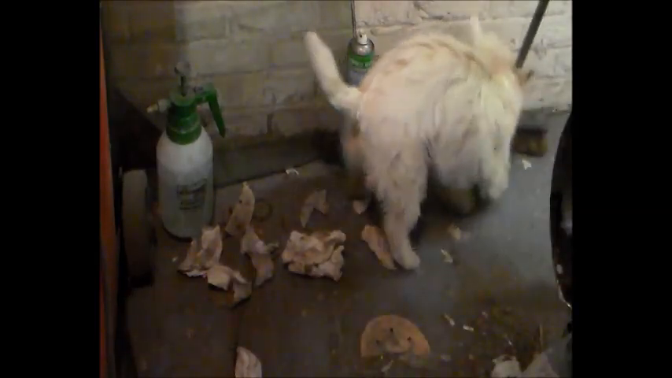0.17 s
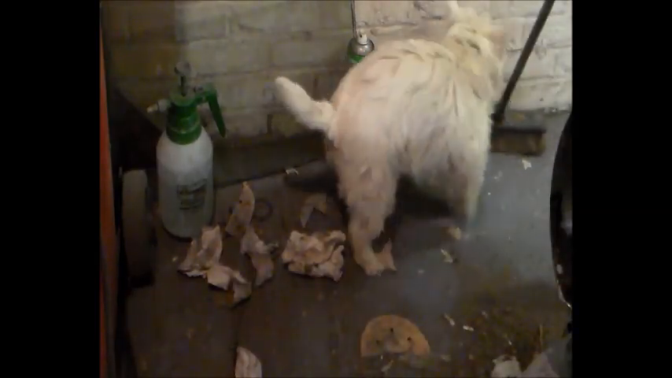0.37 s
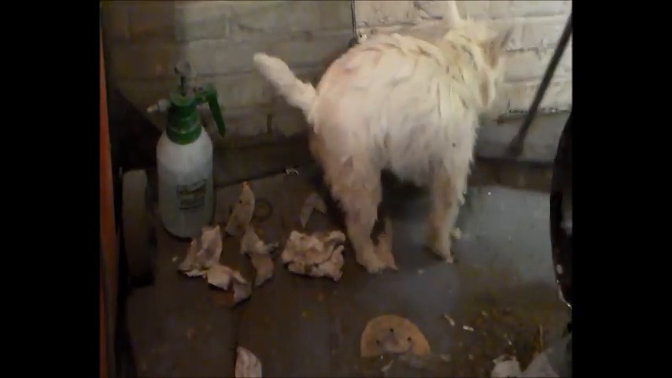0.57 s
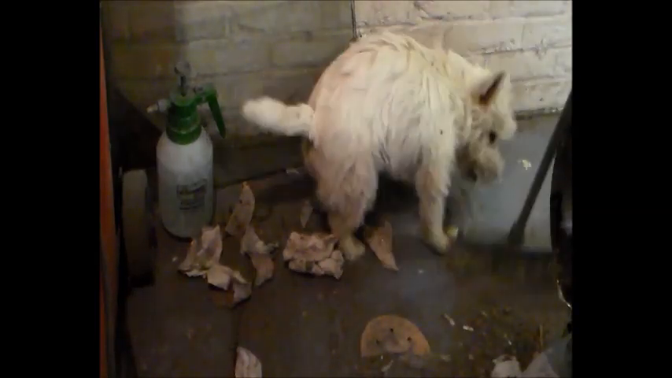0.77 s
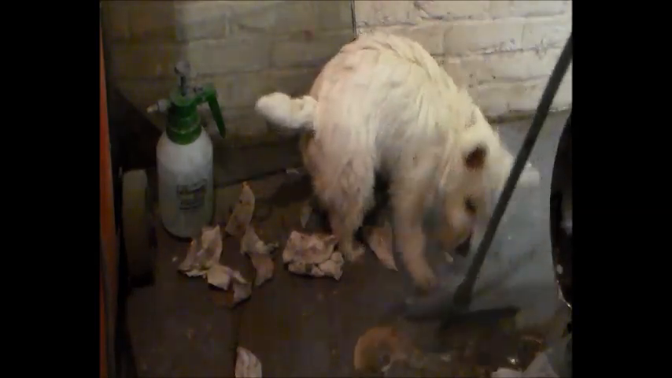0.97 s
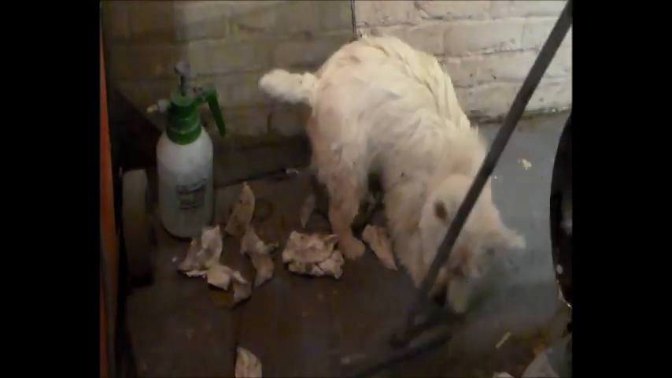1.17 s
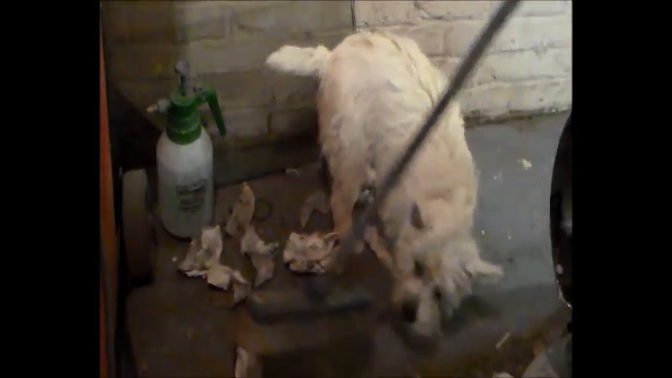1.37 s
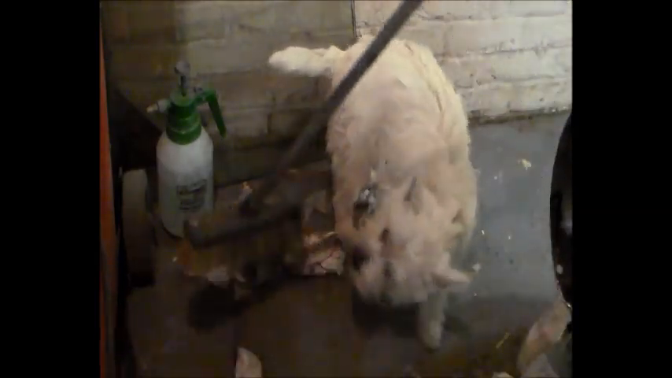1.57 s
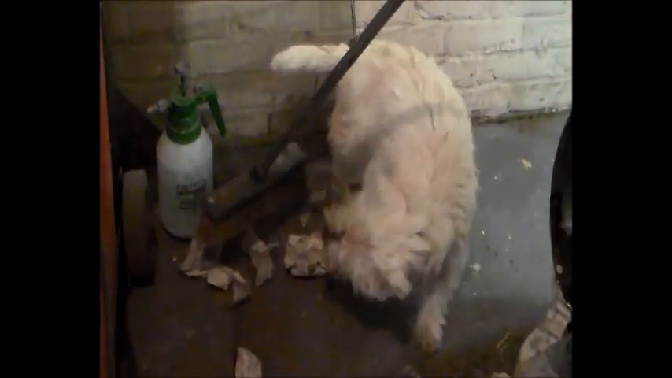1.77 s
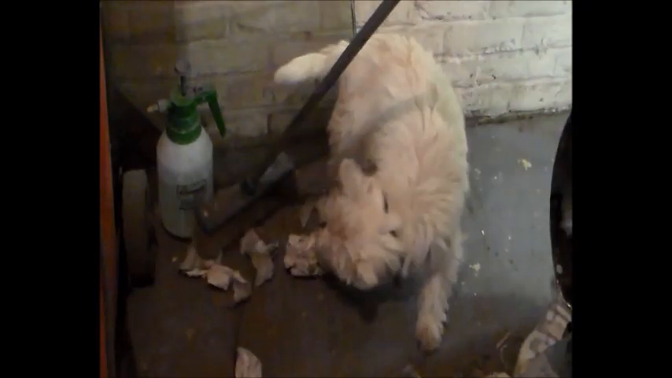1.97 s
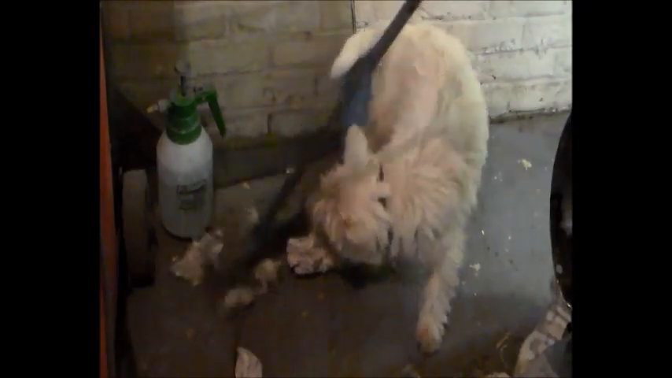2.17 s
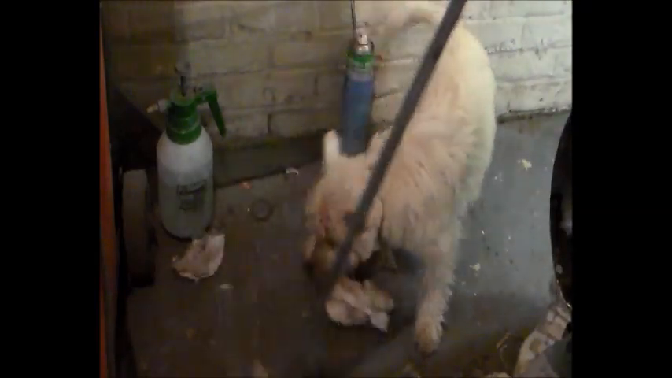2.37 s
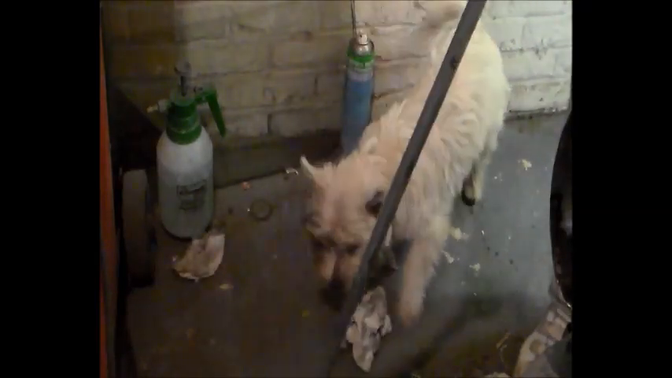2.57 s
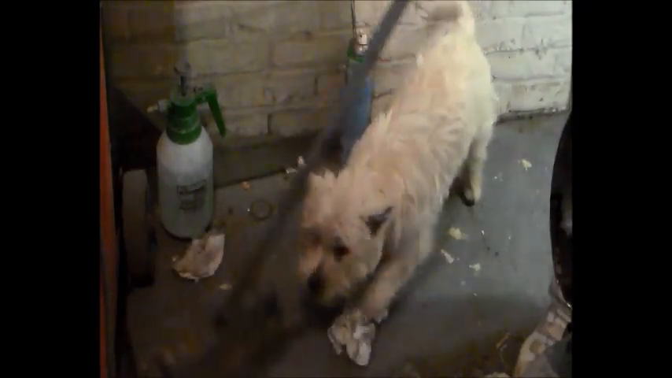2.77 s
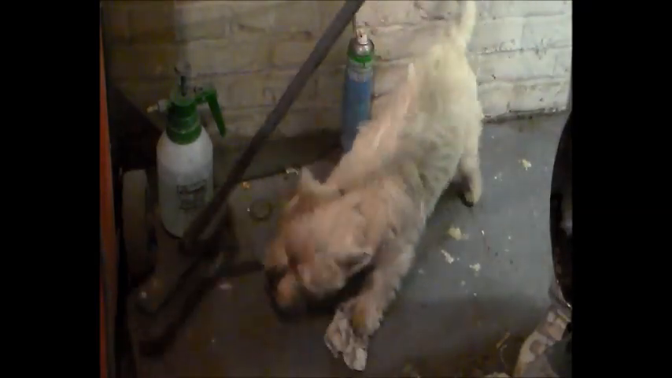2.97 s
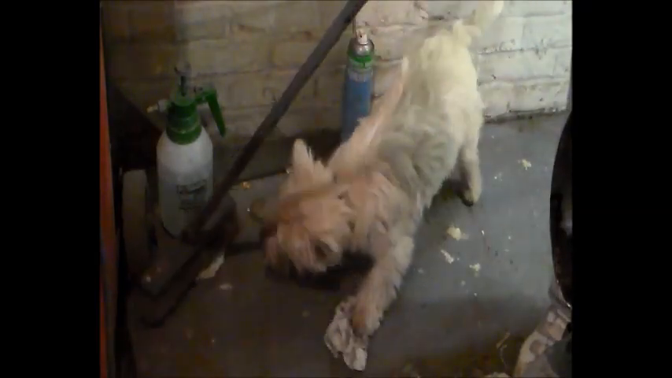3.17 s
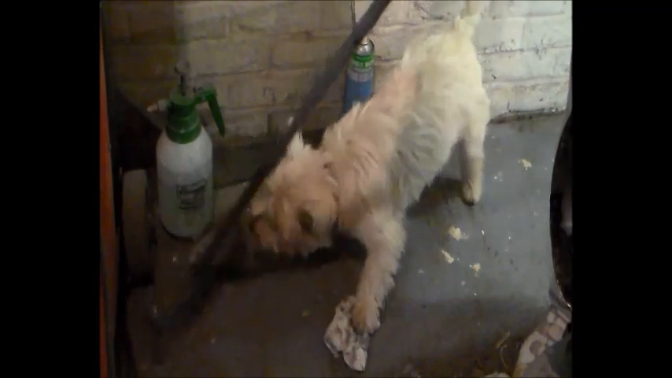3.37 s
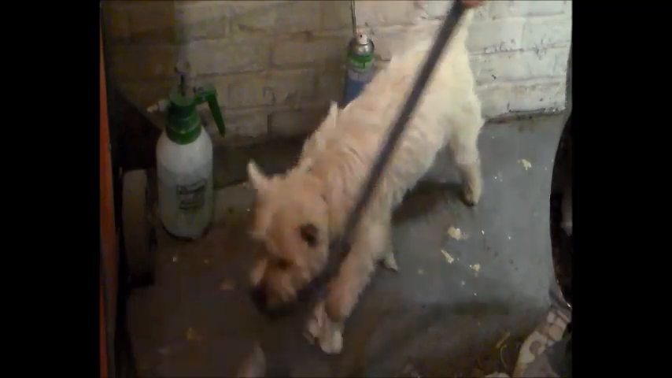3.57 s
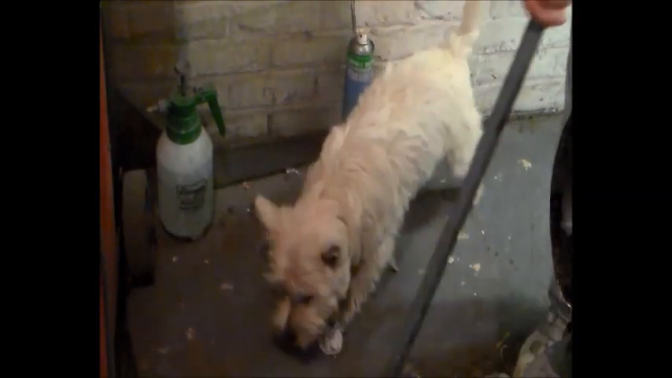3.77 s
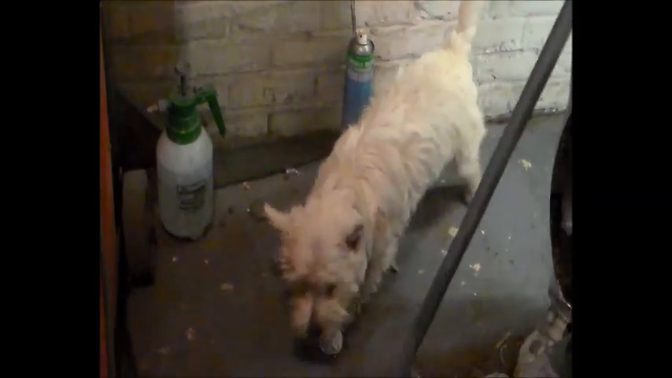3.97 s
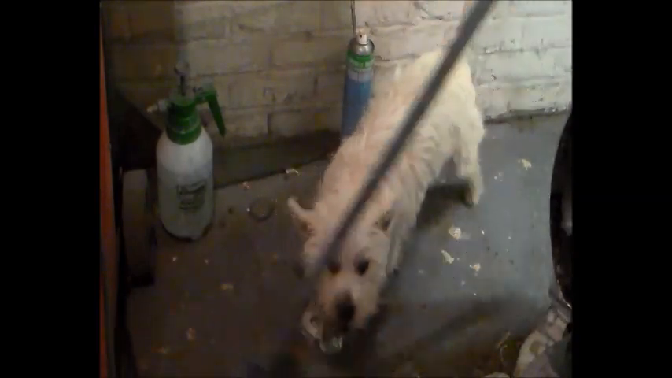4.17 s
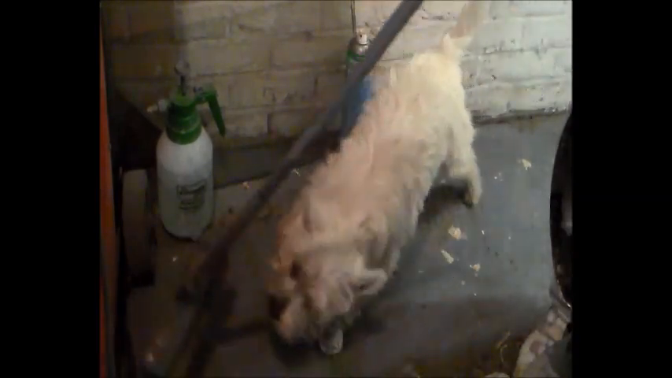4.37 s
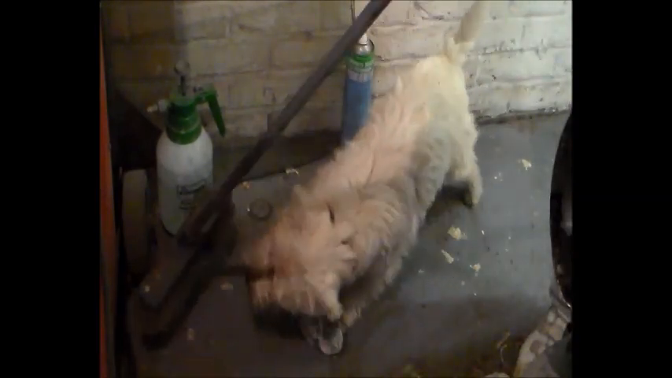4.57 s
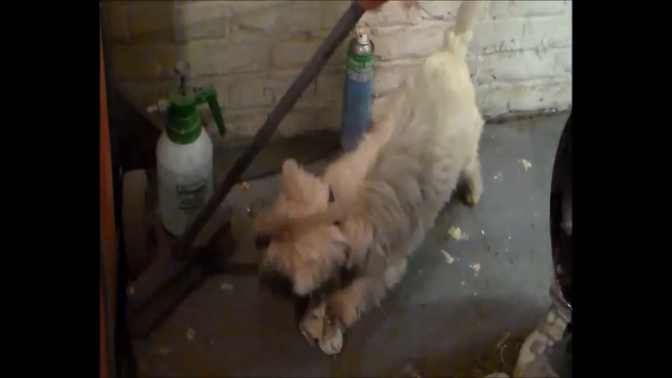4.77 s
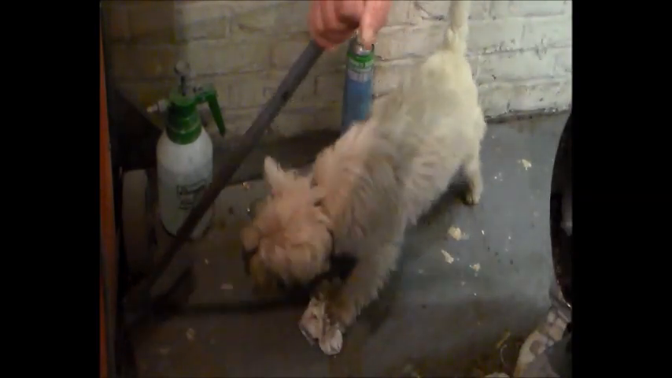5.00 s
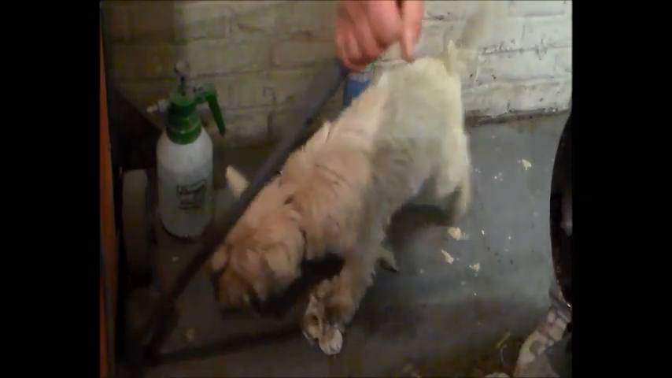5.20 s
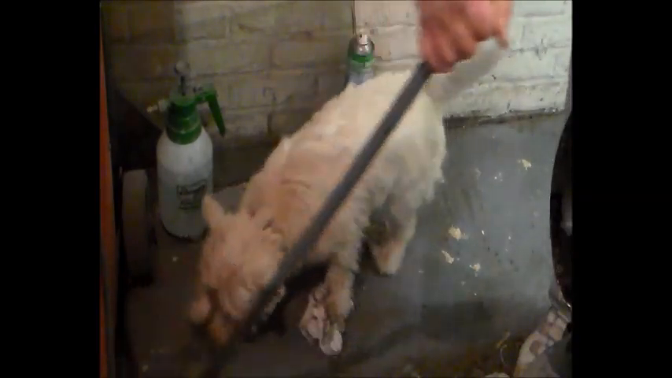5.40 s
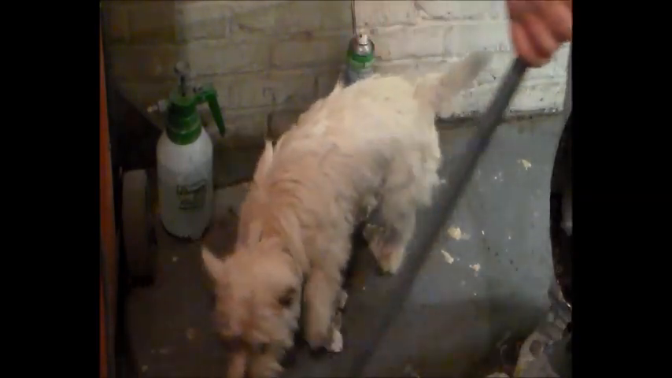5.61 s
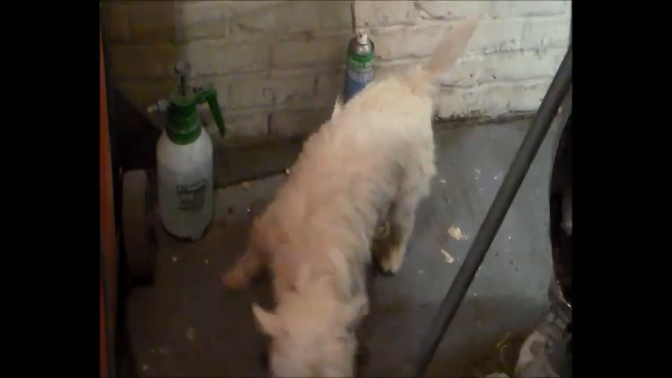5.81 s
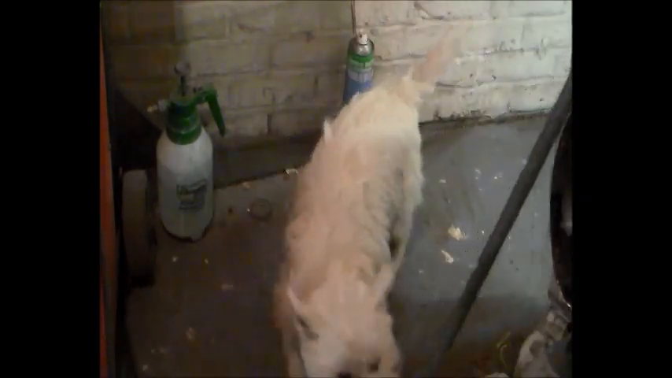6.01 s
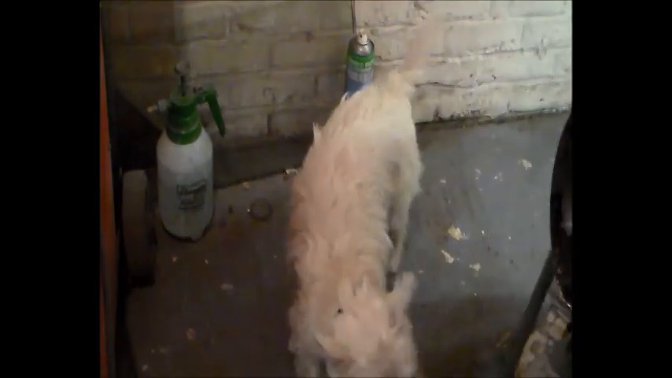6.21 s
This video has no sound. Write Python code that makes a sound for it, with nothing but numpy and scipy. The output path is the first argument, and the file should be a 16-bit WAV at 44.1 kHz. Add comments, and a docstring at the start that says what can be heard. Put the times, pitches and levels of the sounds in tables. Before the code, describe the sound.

A close stereo scene in a small, hard concrete garage, with faint hiss, low rumble and a wavering machine hum. At 0-0.25 s light dull bumps tap while an earlier sound's tail dies away. A bright, stiff-bristled sweep grows from about 0.8 s, with a crisp scuff at 0.9, fading by 1.4. Soft bumps and a tag clink come near 1.75. Wooden clacks at 2.1 lead into two quick, strong swishes at 2.25-2.6. From 3.25 to 3.7 the head clacks and rattles in a cluster with clinking collar tags; gritty scuffs follow at 3.8 and 4.2, with more clinks at 4.3. Faint squeaks come around 4.5-4.9. A heavy, hollow thump hits at 5.2, then tags clink at 5.35 and a ring pings at 5.55. Quieter scrapes finish by 6.2 as traffic swells and a distant engine rises.

```python
"""A concrete garage, heard close up on two microphones: a stiff broom sweeps in short strokes, made of
shaped noise, while a small dog chases it. Noise bursts through resonances make the wooden head clack
and bump on floor and wall; decaying sines make the collar tags clink. Filtered noise makes scuffs,
and unsteady sines make faint squeaks. Behind them a wavering machine hum lies over rumble; in the
background air noise an earlier sound's tail dies away at the start, traffic swells later and a
thump's tail lifts it near 5.2 s, as a distant engine, a rising sine, picks up speed."""
import sys
import numpy as np
from scipy import signal
from scipy.fft import rfft, irfft, next_fast_len
from scipy.io import wavfile

SR = 44100
rng = np.random.default_rng(int(sys.argv[2]) if len(sys.argv) > 2 else 0)


def store_pcm(level_fs):
    """Save levels as 16-bit WAV."""
    pcm = np.round(np.clip(level_fs, -1, 1) * 32767).astype(np.int16)
    wavfile.write(sys.argv[1], SR, np.atleast_2d(pcm).T)


N = 275536
TIME = np.arange(N) / SR
HIT = TIME[:SR // 3]  # time axis of one hit, s


def amp(db):
    """Decibels to gain."""
    return 10 ** (np.asarray(db) / 20)


def unit(x):
    """Scale to rms 1."""
    return x / np.sqrt(np.mean(x ** 2) + 1e-20)


def along(points, hz):
    """(Hz, value) points read on a log axis."""
    f, v = np.transpose(points)
    return np.interp(np.log(hz + 1), np.log(f + 1), v)


def curves(rows):
    """One value per sample for each column after the time."""
    s, *cols = np.transpose(rows)
    return [np.interp(TIME, s, c) for c in cols]


def wobble(rate):
    """A smooth random curve with about rate knots a second."""
    knots = np.clip(rng.standard_normal(16384), -2.5, 2.5)
    fine = signal.resample(knots, 4 * len(knots))
    return np.interp(TIME * rate, np.linspace(0, len(knots), len(fine)), fine)


def filtered(x, response):
    """x through a frequency response."""
    n = x.shape[-1]
    m = next_fast_len(n + 1024, True)
    return irfft(rfft(x, m) * response(np.fft.rfftfreq(m, 1 / SR)), m)[..., :n]


def causal(gain):
    """The minimum-phase response with this gain, so nothing sounds before the blow."""
    cepstrum = irfft(np.log(np.maximum(gain, 1e-6)))
    half = len(cepstrum) // 2
    cepstrum[1:half] *= 2
    cepstrum[half + 1:] = 0
    return np.exp(rfft(cepstrum))


def resonances(modes, hz):
    """Gain of a set of (Hz, width Hz, dB) resonances, added as powers."""
    power = 0
    for centre, width, db in modes:
        damping = hz * width
        power = power + (amp(db) * damping) ** 2 / ((centre * centre - hz * hz) ** 2 + damping ** 2)
    return np.sqrt(power)


def band(hz, centre_hz, octaves):
    """A rounded hump of gain on a log axis, halved this many octaves either side of its centre."""
    return 1 / (1 + np.abs(np.log2((hz + 1) / centre_hz) / octaves) ** 2.7)


# how long the garage rings at each pitch: (pitch_hz, t60_s)
ROOM_DECAY = [(120, 0.6), (500, 0.35), (1500, 0.28), (4000, 0.23), (12000, 0.092)]


def garage():
    """A fresh mid and side room tail: noise dying at its own rate at each pitch, mid energy about 1."""
    hz, t, z = signal.stft(rng.standard_normal((2, len(HIT))), SR, nperseg=256)
    decay = amp(-60 * t / along(ROOM_DECAY, hz)[:, None])
    tail = signal.istft(z * decay, SR, nperseg=256)[1][:, :len(HIT)]
    return tail / np.linalg.norm(tail[0])


def noise(spectrum, grain=1):
    """Mid and side noise of rms 1: modulated by grain, combed by a short room tail and coloured."""
    source = grain * rng.standard_normal((2, N))
    echoes = signal.oaconvolve(source, garage()[:, :SR // 10], axes=1)[:, :N]
    return unit(filtered(source + .5 * echoes, lambda hz: amp(along(spectrum, hz))))


def blow(colour, rattle_db, rattle_t60, room_db):
    """One contact, early echoes off floor and wall, a rattle and the room, through the struck thing."""
    rattle = rng.laplace(size=(2, len(HIT))) * amp(-60 * HIT / rattle_t60)
    force = amp(rattle_db) * rattle / np.linalg.norm(rattle[0])
    force[0, 0] += 1  # the contact itself
    echo_s = rng.uniform(.001, .007, size=4)
    force[0, np.round(echo_s * SR).astype(int)] += rng.normal(0, .42, size=4)
    force = force / np.linalg.norm(force[0]) + amp(room_db) * garage()
    return filtered(force, lambda hz: causal(colour(hz)))


def add(track, s, db, hit):
    """Lay a hit into the track; db sets the spread of its first 20 ms in the mid."""
    part = track[:, max(round(s * SR), 0):][:, :len(HIT)]
    part += amp(db) * hit[:, :part.shape[1]] / np.std(hit[0, :SR // 50])


# background air noise, level before a fixed lift: an earlier sound's tail dies away at the start,
# traffic swells later, a thump's tail lifts it near 5.2 s: (time_s, level_db)
AIR_LEVEL = [(0, -44.5), (.45, -64.5), (1.2, -65.5), (1.7, -55.5), (2.4, -65), (3.2, -59.5), (3.5, -55),
             (5.2, -48), (5.55, -52), (6.25, -46.5)]
# distant engine picking up speed, level before its wobble: (time_s, pitch_hz, level_db)
DISTANT_ENGINE = [(2, 50, -77.5), (4.5, 58, -61), (5.3, 63, -64), (6.25, 68, -54)]
# wavering low machine hum, level before its wobble: (pitch_hz, level_db)
MACHINE_HUM = [(41.2, -50), (122.3, -71.5)]
# colour of the background air noise: (pitch_hz, density_db)
AIR_COLOUR = [(60, 0), (130, 0), (450, 0), (700, -1.5), (950, 1), (1500, -5.5), (3000, -16.5),
              (14000, -31.5)]
# colour of the low rumble: (pitch_hz, density_db)
RUMBLE_COLOUR = [(10, -18), (25, 12), (42, -7), (60, 7.5), (90, -28), (200, -50)]


def background():
    """Wavering sines for machine and rising engine; coloured noise for rumble, air, traffic and tails."""
    air_db, = curves(AIR_LEVEL)
    engine_hz, engine_db = curves(DISTANT_ENGINE)
    hum = np.zeros(N)
    for hz, db in MACHINE_HUM:
        level = amp(db + 2.3 * wobble(11))
        hum += level * np.sin(2 * np.pi * hz * TIME + 0.36 * wobble(1.7))
    engine = amp(engine_db + 5.4 * wobble(4.6)) * np.sin(2 * np.pi * np.cumsum(engine_hz) / SR)
    air = amp(air_db + 3.5) * noise(AIR_COLOUR)
    rumble = amp(-53.5) * noise(RUMBLE_COLOUR)
    tones = np.sqrt(2) * np.array([hum + engine, np.zeros(N)])  # mid only
    return air + rumble + tones


# faint squeaks of the dragged head, level before its wobble: (start_s, length_s, level_db, pitch_hz)
HEAD_SQUEAKS = [(4.53, .36, -49.5, 1670), (4.697, 0.19, -53, 1410)]


def squeaks():
    """The dragged head sticks and slips at an unsteady pitch, swelling and fading."""
    slow_share, fast_share = 0.011, 0.0246  # depth of pitch change as a share of the pitch
    track = np.zeros((2, N))
    for start, length, db, hz in HEAD_SQUEAKS:
        swell = np.sin(np.pi * np.clip((TIME - start) / length, 0, 1))
        pitch_hz = hz * (1 + slow_share * wobble(14) + fast_share * wobble(260))
        phase = 2 * np.pi * np.cumsum(pitch_hz) / SR
        tone = np.sin(phase) + amp(-16) * np.sin(2 * phase)  # with the octave above
        track[0] += swell * amp(db + 3.4 * wobble(45)) * tone
    return track


# scuffs and scraping squeaks as the broom lands or catches, level at the peak before the uneven grit:
# (peak_s, level_db, centre_hz, width_octaves, rise_per_20_db_s, fall_t60_s)
BROOM_SCUFFS = [(0.9, -26.5, 8000, 0.95, 0.017, 0.11), (1.182, -40, 3000, 0.47, 0.13, 0.12),
                (1.749, -46, 2580, .8, 0.022, .22), (2.155, -41.5, 9100, 3.3, 0.085, 0.28),
                (2.275, -28.5, 6250, 0.48, 0.037, 0.093), (2.48, -31, 5900, 0.26, 0.071, 0.55),
                (2.61, -42.5, 1940, 0.29, 0.022, 0.39), (2.702, -39, 1800, 0.45, 0.053, 0.39),
                (3.776, -28, 3880, 0.63, 0.044, 0.18), (3.895, -36, 1100, 1.03, 0.18, 0.45),
                (4.207, -34.5, 3880, 0.82, 0.014, 0.15), (4.2438, -36, 4000, 1.3, .001, 0.035),
                (4.917, -44, 3430, 0.7, .002, 0.062), (4.987, -44.5, 8000, 4.5, .003, 0.17),
                (5.2, -45.5, 486, 0.13, 0.35, 0.67), (5.206, -32.5, 5960, 1.7, 0.0023, 0.031),
                (5.94, -44.5, 3630, 0.78, 0.042, 0.11)]


def scuffs():
    """Short gritty rubs: bands of noise that swell and die away."""
    track = np.zeros((2, N))
    lead = SR * 4 // 5  # samples kept before each peak
    t = TIME[:2 * lead] - lead / SR
    for s, db, centre_hz, octaves, rise, t60 in BROOM_SCUFFS:
        white = rng.standard_normal((2, len(t)))
        rub = unit(filtered(white, lambda hz: band(hz, centre_hz, octaves)))
        swell = amp(db + np.minimum(20 * t / rise, -60 * t / t60))
        part = track[:, round(s * SR) - lead:][:, :len(t)]
        part += (rub * swell)[:, :part.shape[1]]
    return track * amp(2.06 * wobble(350))  # grit catches unevenly


# dull bumps of the broom on floor, wall and clutter, rattle relative to the contact:
# (start_s, level_db, centre_hz, width_octaves, rattle_db)
BROOM_BUMPS = [(0.002, -40, 1300, 2.2, 6), (0.022, -41, 450, 1.2, 6), (0.1168, -29.5, 965, 0.62, -13),
               (0.169, -45, 1250, 0.3, 4), (0.2165, -40, 410, 0.67, 3), (0.2172, -38, 980, 0.35, 12),
               (1.509, -47.5, 341, 0.52, 5), (1.532, -47.5, 1000, .85, 12), (1.737, -40, 810, 1.5, 18.5),
               (1.748, -43, 480, 0.62, 12), (3.305, -42.5, 200, 0.77, -5), (3.318, -49.5, 420, 0.76, 10),
               (3.372, -34.5, 306, 4.9, 7), (3.559, -48.5, 118, 0.66, 10), (4.918, -41, 806, 4.5, 0),
               (4.935, -38, 240, 0.82, 5), (5.2057, -25.5, 700, 1.46, 0.5), (5.2112, -24, 484, 0.76, -0.5),
               (5.214, -35.5, 172, 0.93, -1)]
# resonances of the bumped things: (pitch_hz, width_hz, gain_db)
BODY_MODES = [(130, 28, 8), (186, 18, 5.5), (262, 16, 4.5), (330, 53, -4.5), (403, 36, 3), (472, 85, 1.5),
              (629, 39, 1.5), (787, 17, 3.5), (905, 30, -1), (1015, 170, -2.5), (1273, 170, -0.5),
              (2450, 1800, -5.5)]


def bumps():
    """Softer, heavier blows: each wakes its own range of resonances and booms in the room."""
    track = np.zeros((2, N))
    for s, db, centre_hz, octaves, rattle_db in BROOM_BUMPS:
        body = lambda hz: resonances(BODY_MODES, hz) * band(hz, centre_hz, octaves)
        add(track, s, db, blow(body, rattle_db, rattle_t60=0.23, room_db=-4.5))
    return track


def chime(modes, colour, clash):
    """Thin metal clashes, then rings at new strengths each time, fluttering as it swings."""
    swing_per_s = 110  # knots of flutter a second
    ring = np.zeros(len(HIT))
    for hz, db, t60 in modes:
        flutter = np.interp(HIT * swing_per_s, np.arange(128), rng.standard_normal(128))
        level_db = db + rng.standard_normal() + 3 * flutter - 60 * HIT / t60
        phase = 2 * np.pi * hz * HIT + .7 * np.roll(flutter, SR // 20)
        ring += colour(hz) * amp(level_db) * np.sin(phase)
    chatter = rng.laplace(size=len(HIT)) * amp(-60 * HIT / 0.036) * np.std(ring[:SR // 100])
    ring += clash * filtered(chatter, lambda hz: colour(hz) * hz / (hz + 5000))
    return ring[None]


# clinks of the collar tags, level before the room mix: (start_s, level_db, brightest_hz)
TAG_CLINKS = [(1.76, -43.5, 11900), (2.81, -53, 8350), (3.306, -37.5, 11200), (3.312, -39, 10400),
              (4.293, -45.5, 8600), (4.315, -45, 5400), (4.331, -43.5, 8700), (4.527, -58.5, 8750),
              (4.673, -59, 8500), (5.3404, -40.5, 11900), (5.346, -44, 6000), (5.375, -50.5, 5170),
              (5.407, -45, 4240), (6.075, -54.5, 8900)]
# pings of the collar's ring, level before the room mix: (start_s, level_db)
RING_PINGS = [(0.215, -55), (5.55, -35.5), (5.574, -43)]
# ringing modes of the tags, level before random variation: (pitch_hz, level_db, t60_s)
TAG_MODES = [(2476, 7, 0.22), (3480, -2, .22), (3850, 7, 0.19), (4750, 0.5, 0.23), (5695, 3, 0.12),
             (6480, 3.5, 0.16), (7740, 0, 0.12), (7880, 1.5, 0.11), (8900, -2, 0.11), (9730, 2, .1),
             (10160, 2, 0.12), (10820, 2.5, .09), (12700, 2.5, .09), (13980, 1, .08)]
# ringing modes of the ring, level before random variation: (pitch_hz, level_db, t60_s)
RING_MODES = [(2285, -12, 0.074), (6056, -12, 0.3), (7074, -8, .11), (7757, 0.5, 0.22), (9512, -18, 0.28),
              (13260, -9, 0.23)]


def collar():
    """The tags strike each other and their ring as the dog lunges; the room blurs them."""
    track = np.zeros((1, N))
    for s, db, bright_hz in TAG_CLINKS:
        add(track, s, db, chime(TAG_MODES, lambda hz: band(hz, bright_hz, octaves=0.49), clash=1.8))
    for s, db in RING_PINGS:
        add(track, s, db, chime(RING_MODES, np.ones_like, clash=0.28))
    direct = np.vstack([track, np.zeros(N)])
    room = signal.oaconvolve(np.vstack([track, track]), garage(), axes=1)[:, :N]
    return amp(-2.5) * direct + amp(-2.5) * room


# sharp clacks of the wooden head, rattle relative to the contact:
# (start_s, level_db, low_knock_db, treble_db, rattle_db)
HEAD_CLACKS = [(2.0976, -28, -5.5, -6, 45), (2.134, -29.5, -4, -1.5, 1), (2.658, -42.5, -6, -28, 5),
               (3.2596, -44, 5, 2, 8), (3.286, -41.5, 19, 3, 4), (3.3638, -26.5, -6, 0, 18),
               (3.4755, -30.5, -11, -4.5, 4), (3.5665, -31.5, -21, -12, -5), (3.5785, -37.5, -15, -10, -12),
               (3.594, -39.5, -13, -9, -5), (3.6267, -33.5, -11, -20, -4), (3.6467, -35.5, -4, -4, -2),
               (3.6676, -34.5, -16, -13, 3), (3.68, -36.5, -27, -7, 6), (4.2044, -38.5, -16, -13, 10),
               (4.2438, -38.5, -2, -13, -14)]
# resonances of the wooden head: (pitch_hz, width_hz, gain_db)
HEAD_MODES = [(628, 31, -1.5), (1020, 1200, -10.5), (1478, 133, 0.5), (1780, 130, -2.5), (2250, 67, -5.5),
              (2670, 220, -12), (3050, 430, -8), (3550, 600, -6.5)]


def clacks():
    """The wooden head knocks and shakes the handle; after a hard blow it bounces once."""
    hard_db, rebound_s, rebound_loss_db = -30.3, .0125, 6
    track = np.zeros((2, N))
    for s, db, knock_db, treble_db, rattle_db in HEAD_CLACKS:
        tilt = [(600, knock_db / 2), (1400, 0), (2000, 0.0069), (3500, treble_db),
                (4200, treble_db), (5200, treble_db - 4.0), (14000, treble_db - 12)]
        handle = lambda hz: resonances([(132.0, 21.0, knock_db)], hz)
        wood = lambda hz: resonances(HEAD_MODES, hz) * amp(along(tilt, hz)) + handle(hz)
        add(track, s, db, blow(wood, rattle_db, rattle_t60=.06, room_db=-7))
        if db > hard_db:
            rebound = blow(wood, rattle_db=6, rattle_t60=.075, room_db=-7)
            add(track, s + rebound_s, db - rebound_loss_db, rebound)
    return track


def stroke(start, attack, length, release, sag_db, darken_db):
    """Gains of tips, scrape and drag: bristles land, bend so the scrape and drag change, and lift."""
    t = np.maximum(TIME - start, 0)
    progress = t / length
    landing = np.minimum(t / attack, 1) ** 0.47
    sag = -sag_db * np.minimum(progress, 1)
    lift = -60 * np.maximum(t - length, 0) / release
    gain = landing * amp(sag + lift)
    bend_db = darken_db * np.minimum(progress, 1.3)  # bending stops at 1.3 lengths
    return gain * np.array([np.ones(N), amp(bend_db), amp(2.74 * bend_db)])  # the drag changes most


# strokes of the broom; levels before each layer's trim, scrape and drag relative to the hiss of the tips,
# darkening is the scrape's growth over one length:
# (start_s, attack_s, length_s, release_t60_s, hiss_db, sag_db, scrape_db, drag_db, darkening_db)
BROOM_STROKES = [(0, .1, 0.21, 1, -48.5, 2, -12.5, -20, 5.5),
                 (0.551, 0.12, 0.32, 0.36, -49, -3.5, -11.5, -24.5, 7),
                 (0.776, 0.15, 0.46, 0.72, -29.5, 5, -13.5, -31, 9),
                 (1.4, 0.069, 0.49, 0.48, -52.5, 7.5, -2.5, -4, 0),
                 (2.228, 0.014, 0.037, .3, -41, -3, -12, -9.5, 1.5),
                 (2.256, 0.028, 0.13, 0.94, -26.5, -0.5, -9.5, -17, -2),
                 (2.42, 0.034, 0.2, 0.32, -27.5, 5.5, -12, -33, 7.5),
                 (2.757, 0.026, 0.22, 0.4, -58, 4, 0.5, 5.5, 0),
                 (3.249, .01, 0.19, 0.39, -58.5, 2, 0.5, 5, 3),
                 (3.491, 0.1, 0.42, 0.66, -41, -4.5, -2, -3, -0.5),
                 (4.161, 0.033, 0.18, 0.32, -53, -6, 2, 7.5, -4),
                 (4.42, 0.36, 0.71, 0.72, -64.5, 8.5, 5.5, 12, 2),
                 (5.024, 0.075, 0.16, 0.49, -50.5, -7.5, -8.5, -5, 0.5),
                 (5.327, 0.051, 0.49, 0.75, -50, -4.5, -7.5, -9, -1),
                 (5.789, 0.054, 0.16, 0.37, -57.5, 6, 8.5, 11.5, 1),
                 (6.077, 0.03, 0.11, 0.43, -65, 15, 15, 11.5, 2)]
# colour of the flicking tips: (pitch_hz, density_db)
TIPS_COLOUR = [(1500, -51), (3500, -14.5), (5500, -3), (8300, -2), (9600, -0.5), (11500, -2.5),
               (14400, -8.5)]
# colour of the bent bristles: (pitch_hz, density_db)
SCRAPE_COLOUR = [(900, -45), (2000, -8), (2700, -1), (3900, 1.5), (4800, 1.5), (5800, -2.5), (7500, -14),
                 (12000, -39)]
# colour of the head dragging over grit: (pitch_hz, density_db)
GRIT_COLOUR = [(200, -15), (600, -11.5), (1000, -6), (1400, -1), (1900, -2.5), (2500, -5), (3500, -7),
               (7000, -38)]


def bristles():
    """Tips flick over concrete, catching in tufts; bent bristles scrape and the head drags over grit."""
    gains = np.zeros((3, N))
    for start, attack, length, release, db, sag_db, scrape_db, drag_db, darken_db in BROOM_STROKES:
        levels = amp([[db], [db + scrape_db], [db + drag_db]])
        shape = stroke(start, attack, length, release, sag_db, darken_db)
        gains = np.maximum(gains, levels * shape)  # the louder stroke wins
    tufts = amp(1.38 * wobble(60) + 0.65 * wobble(450))
    grit = wobble(1100)
    hiss = amp(-0.06) * gains[0] * noise(TIPS_COLOUR, tufts)
    scrape = amp(-1.5) * gains[1] * noise(SCRAPE_COLOUR, tufts * amp(2 * grit))
    drag = amp(-0.46) * gains[2] * noise(GRIT_COLOUR, tufts * amp(1.8 * grit))
    return hiss + scrape + drag


# gain of the difference between the two microphones: (pitch_hz, side_db)
STEREO_SPREAD = [(50, -21), (500, -22), (1400, -23), (2900, -21), (3900, -14), (5200, -7), (9000, -4.8),
                 (14000, -4.8)]
# colour of the microphones' own hiss: (pitch_hz, density_db)
HISS_COLOUR = [(60, 14), (250, 7), (800, 2.5), (2500, 1.5), (14000, -6)]


def scene():
    """Two close microphones hear the bass alike and the treble differently; each has its own faint hiss."""
    mid, side = background() + squeaks() + scuffs() + bumps() + collar() + clacks() + bristles()
    side = filtered(side, lambda hz: amp(along(STEREO_SPREAD, hz)))
    white = rng.standard_normal((2, N))
    hiss = amp(-57.5) * unit(filtered(white, lambda hz: amp(along(HISS_COLOUR, hz))))
    balance = amp([[.25], [-.25]])  # left a touch louder
    return np.array([mid + side, mid - side]) * balance + hiss


def record(dry):
    """A steep filter keeps nothing above the band limit of 14450 Hz."""
    return filtered(dry, lambda hz: hz < 14450)


dry = scene()
out = record(dry)
store_pcm(out)
```